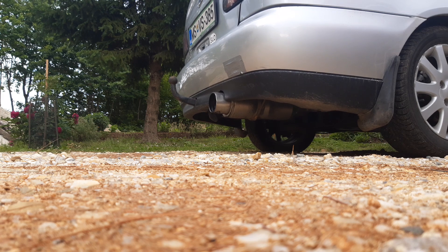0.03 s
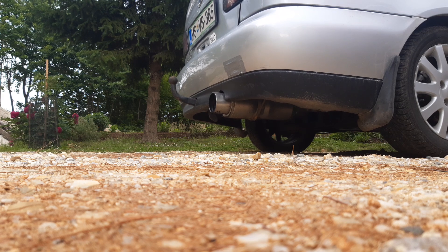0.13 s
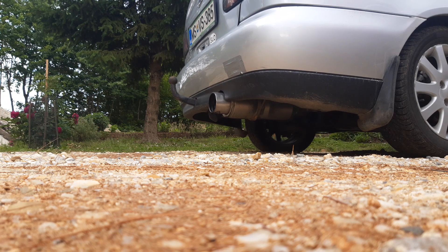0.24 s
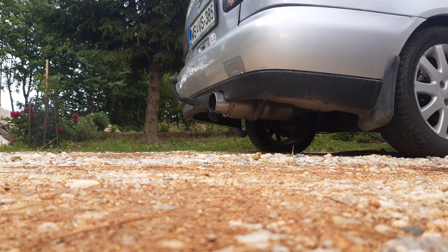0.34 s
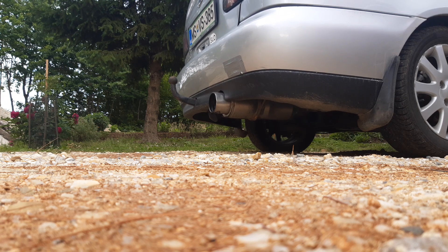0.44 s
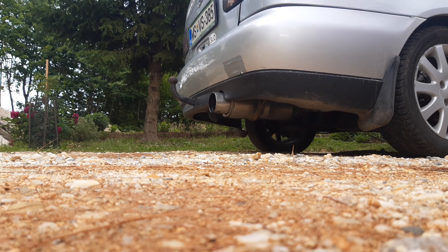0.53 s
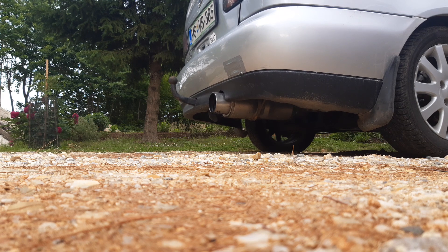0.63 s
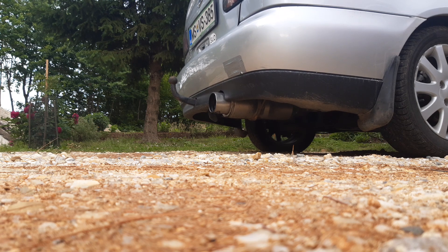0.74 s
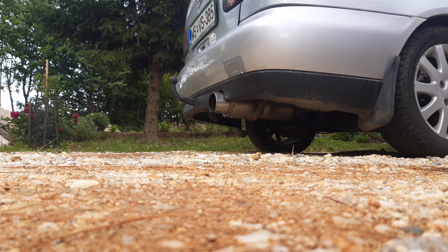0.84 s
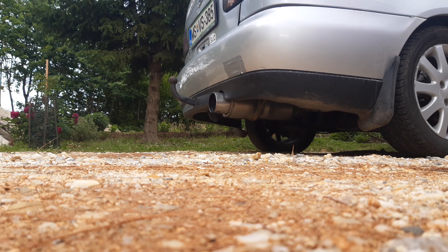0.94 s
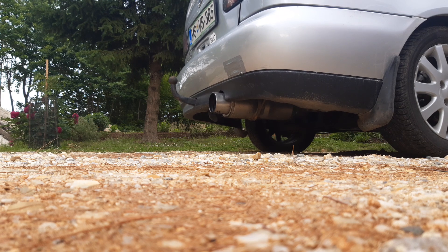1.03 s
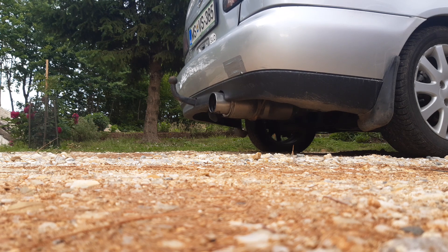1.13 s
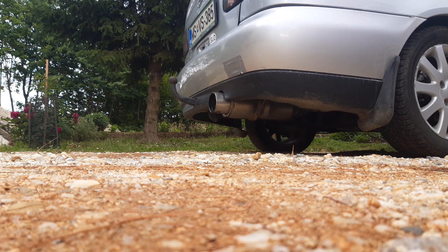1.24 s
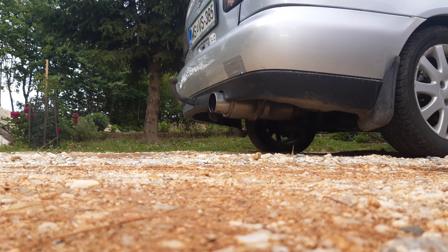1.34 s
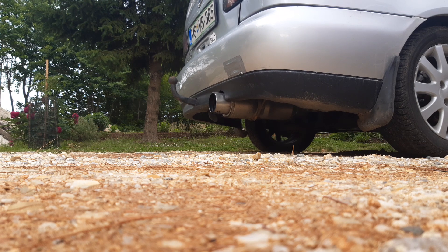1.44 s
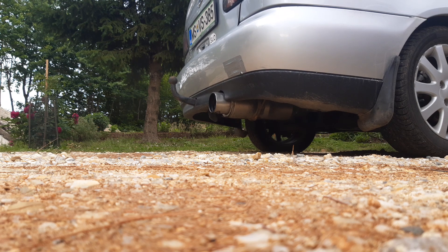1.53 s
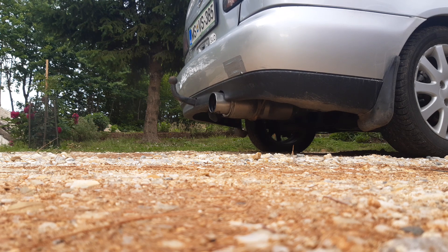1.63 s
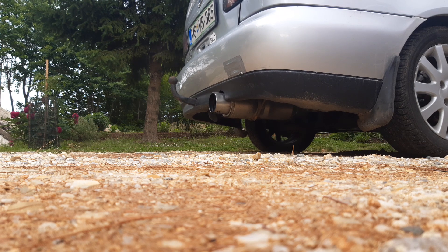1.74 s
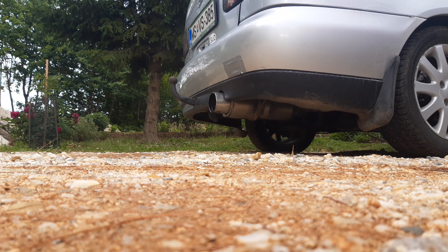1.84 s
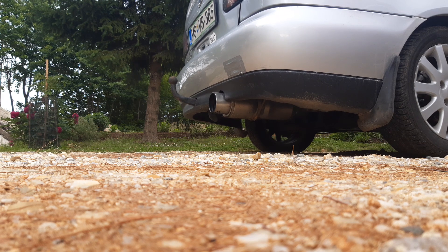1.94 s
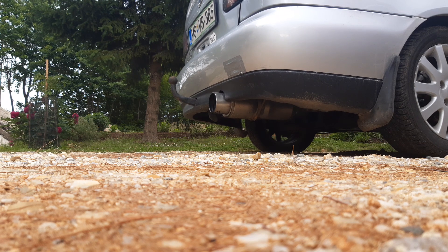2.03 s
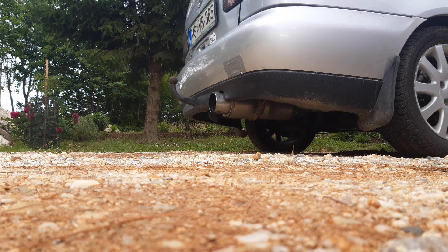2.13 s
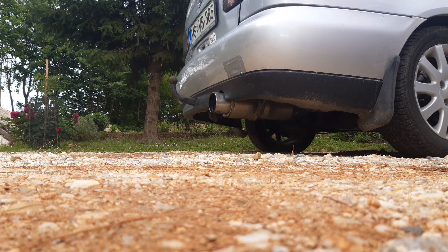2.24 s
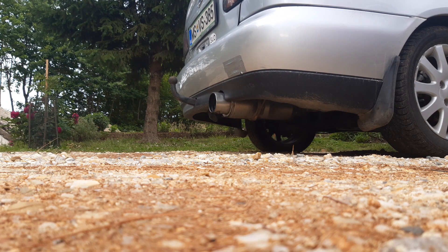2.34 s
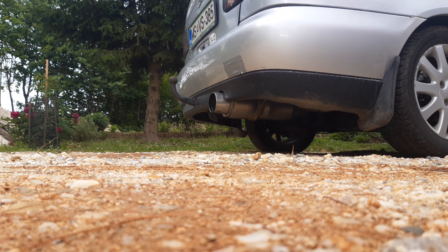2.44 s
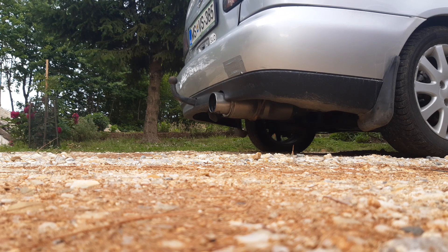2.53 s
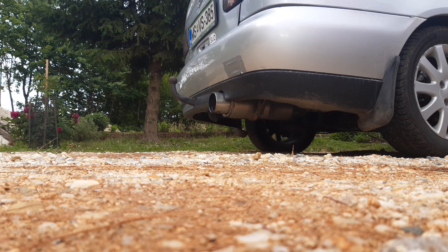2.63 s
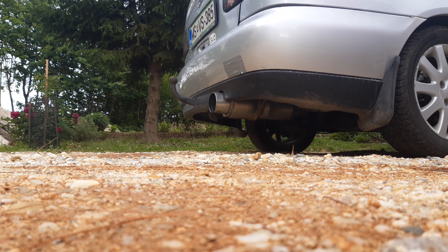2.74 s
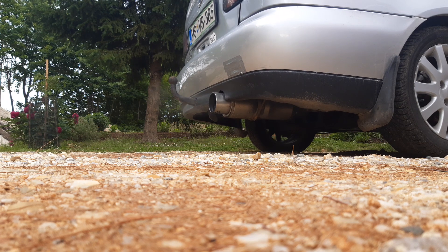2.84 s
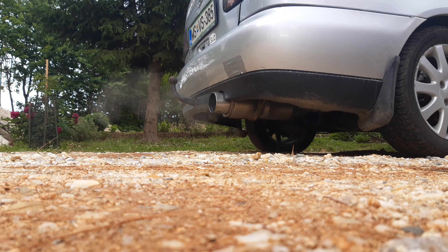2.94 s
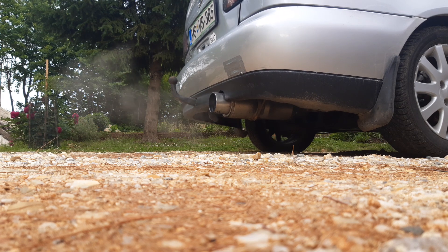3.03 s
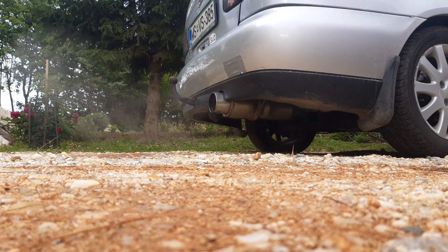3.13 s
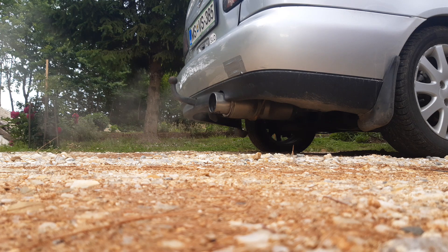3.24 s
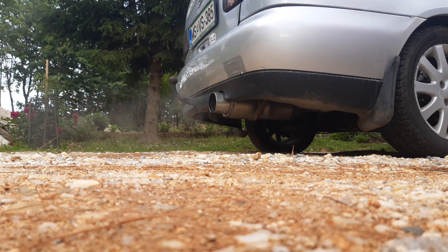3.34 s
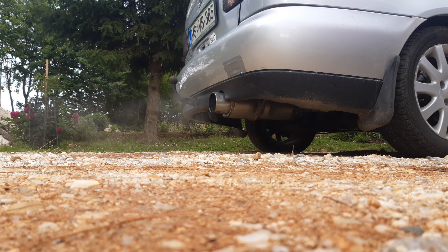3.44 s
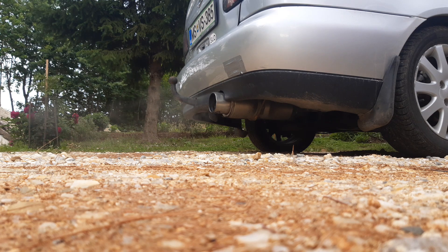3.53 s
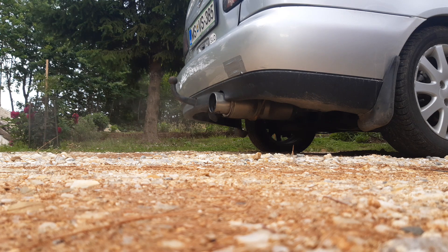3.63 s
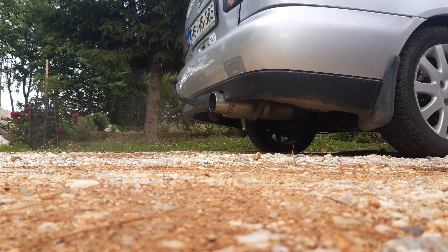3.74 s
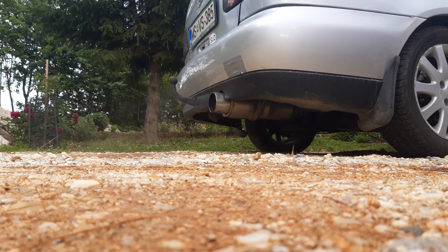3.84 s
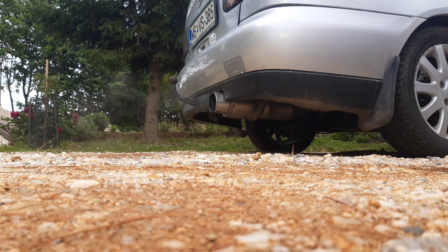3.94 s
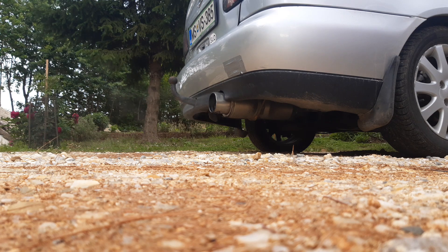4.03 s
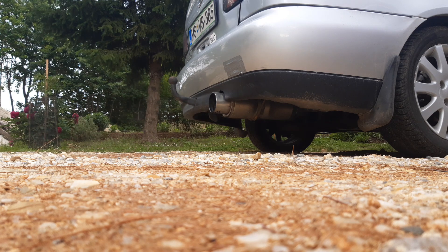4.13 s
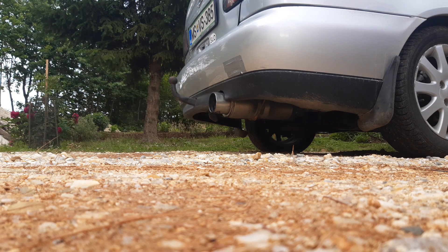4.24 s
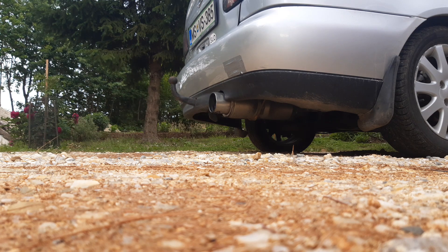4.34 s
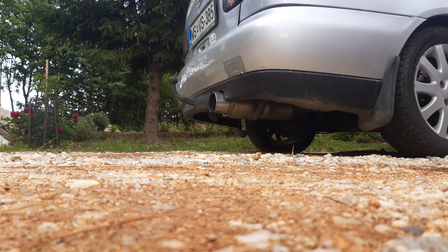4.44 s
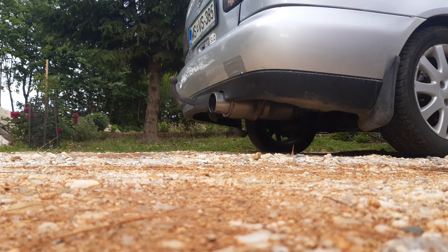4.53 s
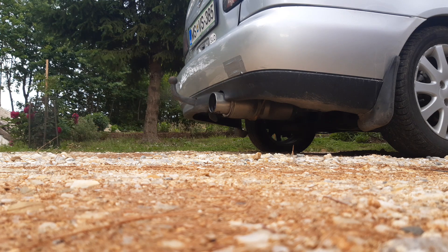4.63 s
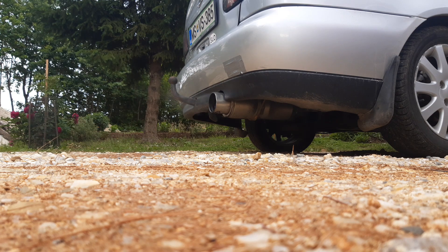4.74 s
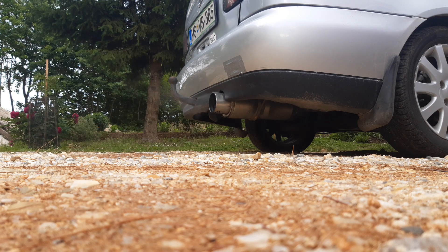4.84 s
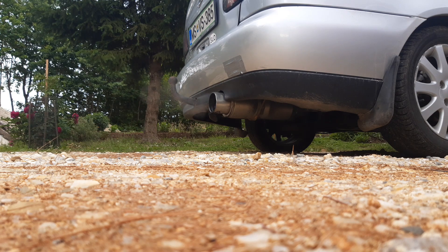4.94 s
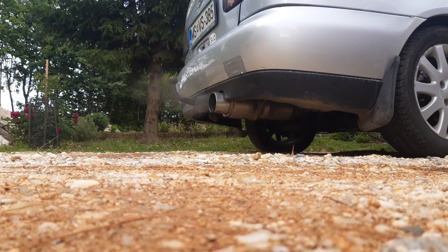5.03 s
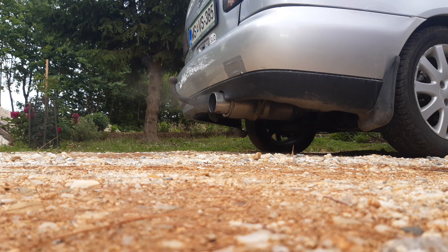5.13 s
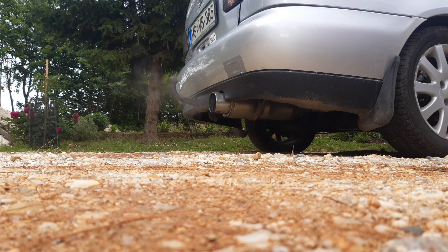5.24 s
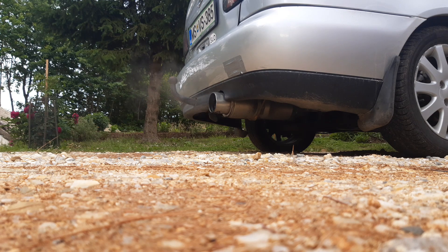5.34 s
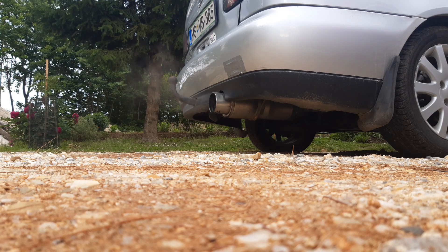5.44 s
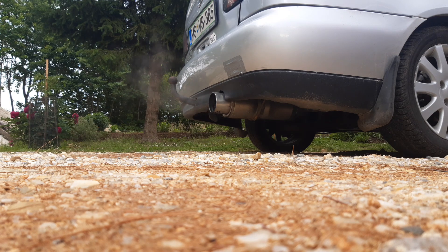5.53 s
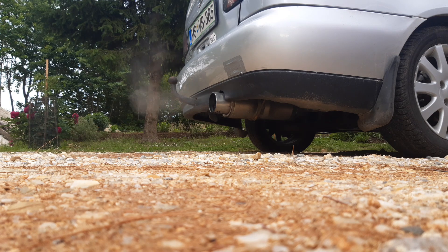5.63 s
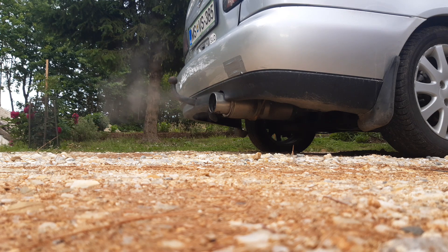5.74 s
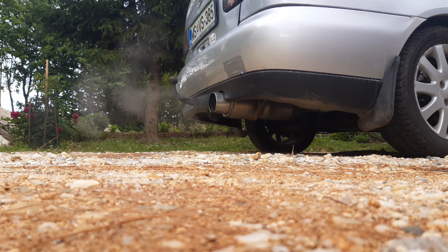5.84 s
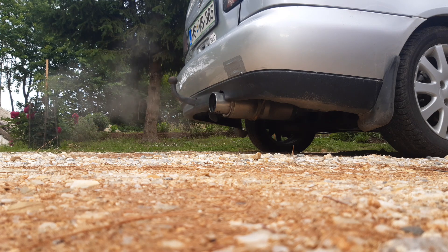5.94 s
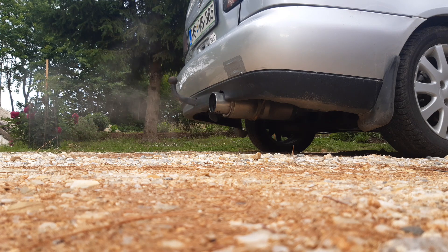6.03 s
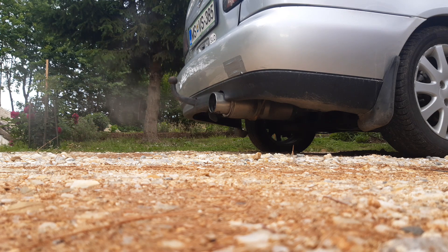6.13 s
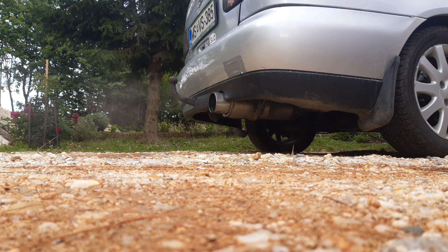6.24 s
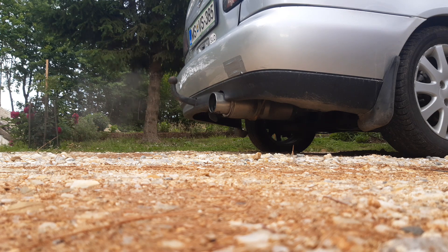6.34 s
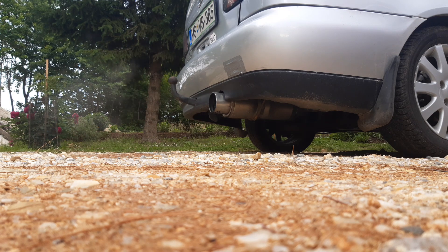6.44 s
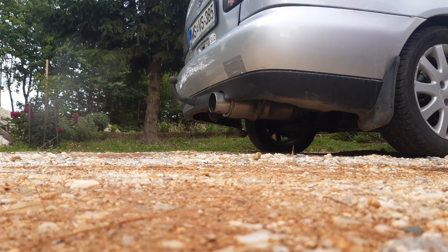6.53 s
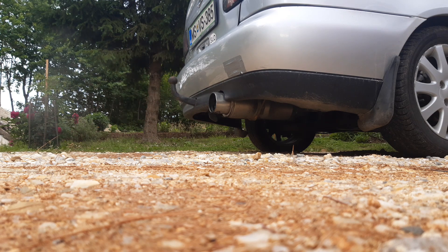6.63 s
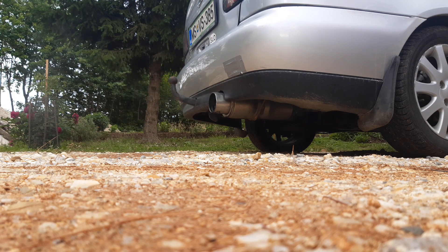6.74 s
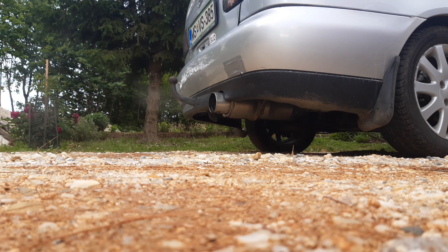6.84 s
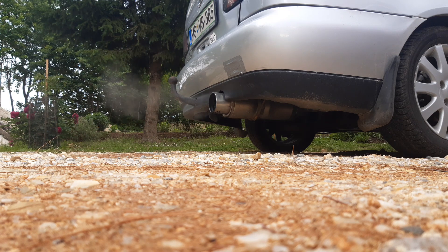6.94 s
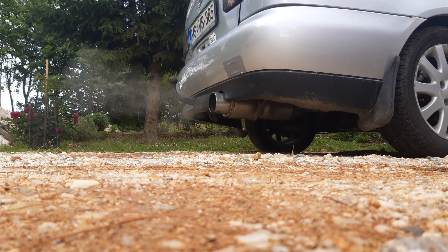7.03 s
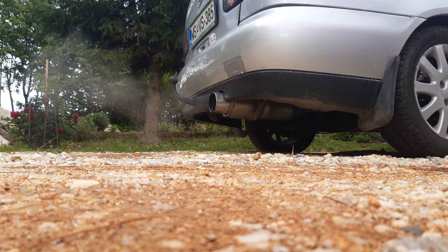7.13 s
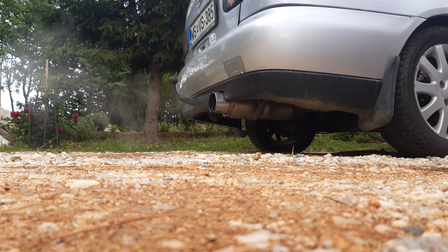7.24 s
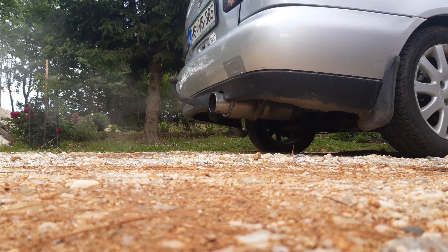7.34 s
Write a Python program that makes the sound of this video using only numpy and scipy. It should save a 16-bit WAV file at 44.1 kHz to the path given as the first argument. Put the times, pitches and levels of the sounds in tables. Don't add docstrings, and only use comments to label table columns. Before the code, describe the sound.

A four-cylinder car idles, then blips four times from the exhaust, booming and hissing, popping as revs fall, ending mid-roar.

```python
import sys
import numpy as np
from scipy import signal
from scipy.fft import rfft, irfft, next_fast_len
from scipy.io import wavfile
from scipy.ndimage import uniform_filter1d, map_coordinates

SR = 44100
rng = np.random.default_rng(int(sys.argv[2]) if len(sys.argv) > 2 else 0)


def dump_mix(stems):
    frames = np.atleast_2d(stems).T
    limited = np.clip(frames, -1, 1)
    pcm = np.round(limited * 32767).astype(np.int16)
    wavfile.write(sys.argv[1], SR, pcm)


def undo_db(level):
    steps = np.asarray(level, float) / 20
    return 10 ** steps


N = 325017


def unit(x):
    return x / np.sqrt(np.mean(x ** 2) + 1e-20)


def along(points, hz):
    f, v = np.transpose(points)
    return np.interp(np.log(hz + 1), np.log(f + 1), v)


def curves(rows):
    s, *cols = np.transpose(rows)
    return [np.interp(np.arange(N) / SR, s, c) for c in cols]


def wobble(rate):
    knots = rng.standard_normal(int(N * rate / SR) + 4)
    return map_coordinates(knots, [np.arange(N) * rate / SR])


def filtered(x, response):
    m = next_fast_len(N + SR // 2)
    return irfft(rfft(x, m) * response(np.fft.rfftfreq(m, 1 / SR)), m)[:N]


def coloured(x, spectrum):
    return filtered(x, lambda hz: undo_db(along(spectrum, hz)))


def noise(spectrum):
    return unit(coloured(rng.standard_normal(N), spectrum))


def tail(t60):
    t = np.arange(SR // 5) / SR
    burst = rng.standard_normal(len(t)) * undo_db(-60 * t / t60)
    return burst / np.linalg.norm(burst)


# time in seconds, firing rate in Hz.
SPEED = [(0.0, 33.2), (1.19, 32.4), (1.46, 51.13), (1.67, 52.3), (1.88, 39.24), (2.22, 32.93),
         (2.82, 33.65), (3.21, 90.7), (3.33, 89.12), (4.13, 44.14), (4.6, 33.39), (5.51, 34.48),
         (5.96, 62.38), (6.24, 52.75), (6.33, 41.53), (6.74, 32.47), (7.22, 70.57), (7.37, 69.78)]
FLYWHEEL_S = 0.17
START_TURN = 2.3


def crankshaft():
    target = curves(SPEED)[0]
    rate = uniform_filter1d(target, size=round(FLYWHEEL_S * SR), mode="nearest")
    turn = START_TURN + 2 * np.pi * np.cumsum(rate) / SR
    return rate, turn


# frequency in Hz, gain in dB.
PIPE = [(25, -28), (45, -20), (70, 1), (88, -2), (105, 5), (135, -18), (170, 3), (203, -29.5), (244, -15),
        (272, -41.5), (320, -23.5), (450, -32.5), (900, -33.5), (3000, -80)]


def pipe(hz):
    grid = np.fft.rfftfreq(SR, 1 / SR)
    cepstrum = irfft(np.log(undo_db(along(PIPE, grid))), SR)
    cepstrum[1:SR // 2] *= 2
    log = rfft(cepstrum[:SR // 2], SR)
    return np.interp(hz, grid, log.real) + 1j * np.interp(hz, grid, log.imag)


# start in seconds, end in seconds.
OVERRUNS = [
    (1.735, 1.84),
    (3.904, 4.13),
    (6.026, 6.36),
]
MISFIRE_DB, MISFIRE_EDGE_S = -9, 0.04


def misfire():
    t = np.arange(N) / SR
    lost = np.zeros(N)
    for start, end in OVERRUNS:
        lost += np.clip(np.minimum(t - start, end - t) / MISFIRE_EDGE_S + .5, 0, 1)
    return MISFIRE_DB * lost


# time in seconds, pressure in dB,
# softness in dB per doubling of order, hard edge in dB.
PULSE = [(0, -29.5, -3, -22), (1.04, -36, -5, -21.5), (1.42, -11, 2.5, -17.5), (1.54, -16, 5, -23),
         (2.21, -33.5, 0.1, -32), (2.7, -35.5, -4, -25), (2.94, -8, 2.5, -9), (3.55, -11.5, 8, -19.5),
         (3.84, -12, 4, -23), (4.23, -26, 12, -44.5), (4.85, -43.5, -3.5, -34.5), (5.45, -32, -3, -25),
         (5.71, -10.5, 3, -15.5), (5.99, -18, -3.5, -22.5), (6.41, -30, 2.5, -30.5), (6.66, -36, -2.5, -33),
         (6.96, -11.5, 0.9, -15), (7.37, -16, 5, -24)]
# frequency in Hz, gain in dB.
STANDING_WAVES = [(65, 4.5), (99, -3.5), (137, 1), (168, -5.5), (182, -13), (200, -3), (262, -10.5),
                  (325, -4.5)]
# firing rate in Hz, gain in dB.
FIRST_ORDER = [(33, -18.5), (44, -14.5), (59, -9), (64, -4.5), (72.6, -1), (78, -2), (89, -7.5)]
SOFT_UP_TO = 3
PIPE_LAG_S = 0.027
FIRST_LOSES = 0.4


def firing(rate, turn):
    pulse_db, soft_db, edge_db = curves(PULSE)
    t = np.arange(N)
    coarse = t[::64]
    heard = np.interp(coarse - PIPE_LAG_S * SR, t, rate)
    tone, lost = np.zeros(N), undo_db(misfire())
    for k in range(1, 11):
        log = pipe(k * heard)
        lag = np.interp(t, coarse, log.imag)
        if k == 1:
            gain = undo_db(along(FIRST_ORDER, heard))
            kept = lost ** FIRST_LOSES
        else:
            gain = np.exp(log.real) * undo_db(along(STANDING_WAVES, k * heard))
            kept = lost
        source_db = pulse_db - soft_db * np.log2(k) if k <= SOFT_UP_TO else edge_db
        level = undo_db(source_db) * np.interp(t, coarse, gain) * kept
        phase = k * turn + lag + .025 * k * wobble(12)
        tone += np.sqrt(2) * level * undo_db(.5 * wobble(14)) * np.cos(phase)
    half_db = pulse_db + along(FIRST_ORDER, rate) - 17 + 1.2 * along(PIPE, 1.5 * rate)
    tone += undo_db(half_db + 2.5 * wobble(6)) * np.cos(1.5 * turn)
    cylinders = 1 + 0.046 * np.cos(turn / 2) + 0.12 * np.cos(turn / 4)
    return tone * cylinders


# start in seconds, strength in dB, thump in Hz, ring of the boxes in dB.
POPS = [(1.781, -16, 78, -21), (1.825, -15.5, 84.5, -13.5), (1.854, -24, 102, -16), (1.926, -19.5, 66, -21),
        (1.955, -25, 80.92, -3), (2.026, -17.5, 91, -11.5), (3.884, -16, 103.4, -2.5),
        (3.945, -20, 104.5, -5.5), (3.974, -20, 106, -2.5), (4.001, -26, 113, -13),
        (4.027, -23.5, 97.1, -0.5), (4.067, -22, 96, -30), (4.11, -23.5, 87, -8), (4.301, -31.5, 82, -6.5),
        (4.331, -33.5, 80.6, -10), (4.629, -28.5, 94.2, -4), (6.031, -12, 80.7, -10),
        (6.072, -15, 73.5, -21), (6.127, -17, 70, -28), (6.183, -12.5, 64.78, -31),
        (6.224, -14.5, 86.4, -23), (6.266, -15, 95, -20), (6.308, -19.5, 79.63, -6.5),
        (6.336, -18, 85, -13), (6.702, -22, 85.13, -3.5)]
# frequency in Hz, level in dB, decay by 60 dB in seconds.
BOXES = [(170.6, 0.5, 0.2), (314.8, -11, 0.19), (244, -25, 0.37)]


def pops():
    t = np.arange(SR // 4) / SR
    push, thump = np.zeros(N), np.zeros(N + SR)
    ring = np.zeros(len(t))
    for hz, db, t60 in BOXES:
        ring += undo_db(db - 60 * t / t60) * np.sin(2 * np.pi * hz * t)
    ring *= 1 - np.exp(-t / 0.015)
    for s, db, hz, ring_db in POPS:
        push[round(s * SR)] = -undo_db(db + 39.5)
        u = t * hz / 0.86
        blow = u ** 2 * np.exp(2 - 2 * u) * np.sin(2 * np.pi * hz * t)
        thump[round(s * SR):][:len(t)] -= undo_db(db) * (blow + undo_db(ring_db) * ring)
    return thump[:N] + filtered(push, lambda hz: np.exp(pipe(hz)))


# frequency in Hz, density in dB per Hz.
ROAR = [(160, -41.5), (280, -12.5), (309, -5), (333, -3.5), (379, -1.5), (447, -0.5), (520, -12.5),
        (642, -9), (714, -15.5), (830, -15), (923, -21), (1090, -20.5), (1180, -29.5), (1380, -23.5),
        (1700, -45), (2210, -65), (3740, -120)]
# frequency in Hz, gain in dB.
TURBULENT = [(300, -3), (480, -2), (800, 0), (1500, 1.5)]


def rasp(rate, turn):
    at = np.flatnonzero(np.diff(np.floor(turn / (2 * np.pi))))
    cylinder = np.resize([0.58, .55, 0.79, .6], len(at))
    edges = np.zeros(N)
    edges[at] = cylinder * undo_db(1.1 * rng.standard_normal(len(at))) / np.sqrt(rate[at])
    smear = rfft(tail(.07), SR // 4)
    echoed = signal.fftconvolve(edges, irfft(smear / np.abs(smear)))[:N]
    return unit(filtered(echoed, lambda hz: undo_db(along(ROAR, hz) - along(TURBULENT, hz))))


# frequency in Hz, gain in dB.
THINNER = [(250, -2), (310, 2), (370, -6), (460, -3), (650, -0.5), (1500, 0.5)]


def roar(rate, turn, idle):
    pulsing = unit(1 + .2 * np.cos(turn / 2))
    rush = undo_db(-4 + 2 * idle) * pulsing * unit(coloured(noise(ROAR), TURBULENT))
    body = rush + undo_db(-2.5 - 3.5 * idle) * rasp(rate, turn)
    return idle * body + (1 - idle) * coloured(body, THINNER)


def drone():
    hz = 314 + 3 * wobble(23)
    return undo_db(-1 + 1.3 * wobble(25)) * np.cos(2 * np.pi * np.cumsum(hz) / SR)


# frequency in Hz, gain in dB.
WHINE = [(300, -31), (420, -18.5), (520, -26.5), (640, -8), (750, -23), (875, -3.5), (980, -30),
         (1120, -13.5), (1250, -33)]
WHINE_ORDER = 12.5
HIGH_ORDERS_DB = -11.5


def whine(rate, turn, idle):
    mesh_db = along(WHINE, WHINE_ORDER * rate) - 3 + 3 * wobble(12)
    mesh = undo_db(mesh_db) * np.cos(WHINE_ORDER * turn + .7 * wobble(30))
    sway = .1 * wobble(15)
    orders = np.zeros(N)
    for k in range(7, 14):
        level_db = along(WHINE, k * rate) + HIGH_ORDERS_DB + 2.1 * wobble(6.3)
        orders += undo_db(level_db) * np.cos(k * (turn + sway) + k * k)
    return mesh + (1 - idle) * orders


# frequency in Hz, density in dB per Hz.
FAST_HISS = [(940, -30.5), (1600, 3), (1700, -3), (2760, -3), (2990, -5), (6210, -14), (8060, -22),
             (9500, -34.5), (12400, -58.5), (20900, -120)]
SLOW_HISS = [(940, -31), (1600, 0), (1720, -2.5), (2140, 1), (2620, -5), (3040, -6), (3940, -6.5),
             (4680, -10.5), (5900, -9.5), (6400, -10), (7160, -15.5), (7940, -16), (9500, -29),
             (12400, -57.5), (20900, -120)]


def hiss(hiss_db):
    fast = np.clip((hiss_db + 67.5) / 5, 0, 1)
    return undo_db(hiss_db + 2.0) * (np.sqrt(fast) * noise(FAST_HISS) + np.sqrt(1 - fast) * noise(SLOW_HISS))


def breath(rate, flow_db):
    climb = np.clip(np.gradient(rate) * SR, 0, 90)
    middle = np.exp(-((rate - 51) / 9) ** 2)
    band = noise([(1700, -34.5), (2050, -1.0), (2750, -2.0), (3200, -28)])
    return undo_db(flow_db - 27.5 + 60 * climb / 1000) * middle * band


# time in seconds, flow in dB.
GAS = [(0, -51.5), (1.1, -52.5), (1.4, -44.5), (1.8, -47.5), (2.1, -54), (2.77, -52.5), (3.03, -37),
       (3.44, -41.5), (3.9, -47), (4.34, -56), (4.7, -59), (5.5, -51.5), (5.78, -41.5), (5.9, -43.5),
       (6.35, -49.5), (6.76, -56.5), (7.0, -40), (7.37, -41.5)]
# firing rate in Hz, level in dB.
HISS_BY_SPEED = [(33, -74.5), (45, -75), (57, -73.5), (70, -68), (90, -67)]
FIZZ_BY_SPEED = [(33, -76), (45, -75.5), (57, -75.5), (70, -75.5), (90, -73.5)]
# frequency in Hz, density in dB per Hz.
FIZZ = [(5590, -52.5), (9500, -22), (12300, -2.5), (15600, -4)]
IDLE_FLOW_DB, HISS_FOLLOWS, FIZZ_FOLLOWS = -52.5, 0.6, 0.66


def gas(rate, turn):
    flow_db, = curves(GAS)
    change_db = flow_db - IDLE_FLOW_DB
    hiss_db = along(HISS_BY_SPEED, rate) + HISS_FOLLOWS * change_db
    fizz_db = along(FIZZ_BY_SPEED, rate) + FIZZ_FOLLOWS * change_db
    idle = np.clip((48 - rate) / 12, 0, 1)
    burble = undo_db(flow_db + 7.5 - .75 * misfire() + 1.5 * wobble(9)) * noise(PIPE)
    voiced = roar(rate, turn, idle) + idle * drone() + whine(rate, turn, idle)
    fizz = undo_db(fizz_db + 4.5) * noise(FIZZ)
    return burble + undo_db(flow_db + 2.0) * voiced + hiss(hiss_db) + breath(rate, flow_db) + fizz


# start in seconds, end in seconds, level in dB.
INTAKE = [
    (1.185, 1.417, -78.5),
    (2.8, 2.811, -76.5),
    (5.59, 5.803, -81),
    (6.795, 6.828, -84.5),
]
INTAKE_RISE_S, INTAKE_FADE_S, INTAKE_SHUT_DB = 0.03, 0.09, -97


def intake():
    t = np.arange(N) / SR
    level_db = np.full(N, float(INTAKE_SHUT_DB))
    for start, end, db in INTAKE:
        nearest = np.minimum((t - start) / INTAKE_RISE_S, (end - t) / INTAKE_FADE_S)
        level_db += (db - INTAKE_SHUT_DB) * np.clip(nearest + 1, 0, 1)
    return undo_db(level_db) * noise([(6500, -42.0), (7700, -9.0), (8100, -2.5), (8500, -4.5), (9500, -38.5)])


# start in seconds, level in dB.
KNOCKS = [(2.856, -65.5), (2.879, -55), (2.902, -51.5), (2.925, -55), (2.945, -55.5), (2.963, -57.5),
          (2.985, -60), (2.999, -64.5), (3.017, -67.5), (6.899, -72.5), (6.978, -61), (7.0, -67),
          (7.266, -64), (7.3, -63.5), (2.397, -76)]
# frequency in Hz, density in dB per Hz.
SHIELD = [(1530, -45.5), (2600, -11), (3430, -6.5), (3720, -4.5), (3950, -5.5), (4770, -15), (6240, -7.5),
          (6930, -12.5), (8240, -12), (9360, -26.5), (9790, -18), (12900, -3), (15600, -14)]
# frequency in Hz, bandwidth in Hz, level in dB.
TIN = [(2800, 110, -5), (3960, 46, -12.5), (6250, 78, -6), (8050, 120, -3.5), (12700, 60, -5),
       (13000, 44, -15), (13400, 41, 1), (13800, 92, -8)]
# time in seconds, frequency in Hz, level in dB.
BEND = [
    (2.85, 3840, -24),
    (2.88, 3930, -3),
    (2.9, 4270, -0.5),
    (2.95, 3850, 4.5),
    (3.0, 3570, 3),
    (3.05, 3360, -25),
]


def shield():
    t = np.arange(SR // 8) / SR
    knocks = np.zeros(N + SR)
    for s, db in KNOCKS:
        knocks[round(s * SR):][:len(t)] += undo_db(db - 60 * t / 0.12) * (1 - np.exp(-t / 0.00094))

    def modes(f):
        return sum(undo_db(db) * 1j * f * w / (c * c - f * f + 1j * f * w) for c, w, db in TIN)

    ring = unit(filtered(rng.standard_normal(N), modes))
    hz, flex_db = curves(BEND)
    flex = wobble(260) * np.cos(2 * np.pi * np.cumsum(hz) / SR)
    return knocks[:N] * (undo_db(7.0) * noise(SHIELD) + undo_db(flex_db) * (undo_db(-8.5) * ring + flex))


# frequency in Hz, level in dB.
PUMP = [(915, -79.5), (1108, -78), (1261, -79.5)]


def pump():
    t = np.arange(N) / SR
    lines = np.zeros(N)
    for hz, db in PUMP:
        phase = 2 * np.pi * hz * t + .5 * wobble(12)
        lines += np.sqrt(2) * undo_db(db + 1.8 * wobble(8)) * np.cos(phase)
    return lines


# start in seconds, start in Hz, end in Hz, level in dB, lead-in in dB.
CHIRPS = [
    (.543, 3600, 3150, -69, -16),
    (.73, 3510, 3100, -68.5, -28),
    (2.232, 3700, 3117, -69, -14.5),
    (4.048, 3620, 3020, -67, -7),
    (4.22, 4130, 3180, -68, -9),
    (5.476, 4100, 2940, -62, -9.5),
]
FLUTTER_HZ, FLUTTER_DEPTH = 585, 0.66


def sparrow():
    t = np.arange(round(0.048 * SR)) / SR
    song = np.zeros(N + SR)
    shape = np.sin(np.pi * (t / t[-1]) ** 0.64) ** 0.76
    lead = shape * np.sin(2 * np.pi * np.cumsum(4750 + 15000 * t) / SR)
    for s, hz0, hz1, db, lead_db in CHIRPS:
        glide = hz1 + (hz0 - hz1) * np.exp(-t / 0.017)
        note = shape * np.sin(2 * np.pi * np.cumsum(glide) / SR)
        song[round(s * SR):][:len(t)] += undo_db(db) * note
        song[round((s - .026) * SR):][:len(t)] += undo_db(db + lead_db) * lead
    flutter = FLUTTER_DEPTH * np.cos(2 * np.pi * FLUTTER_HZ * np.arange(N) / SR)
    hoarse = song[:N] * (1 + flutter + .85 * wobble(1300))
    return hoarse + undo_db(-2) * signal.fftconvolve(hoarse, tail(0.2))[:N]


def scene():
    rate, turn = crankshaft()
    exhaust = firing(rate, turn) + pops() + gas(rate, turn)
    return (exhaust + intake() + shield() + pump() + sparrow())[None]


def roll_off(x):
    return signal.sosfilt(signal.butter(12, 15720, fs=SR, output="sos"), x)


def record(dry):
    mix = filtered(dry[0], lambda hz: (hz < 15750) * hz ** 2 / (hz ** 2 + 24 ** 2))[None]
    return roll_off(mix)


dry = scene()
out = record(dry)
dump_mix(out)
```